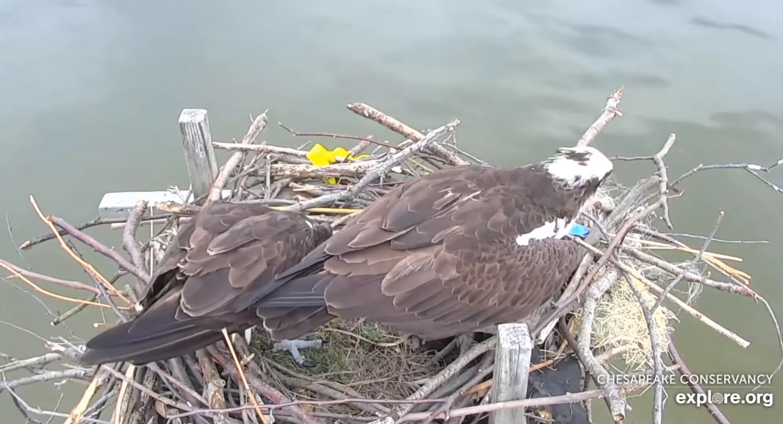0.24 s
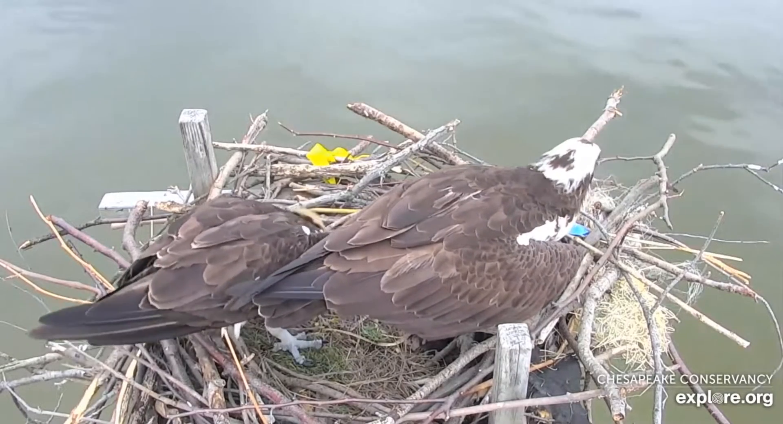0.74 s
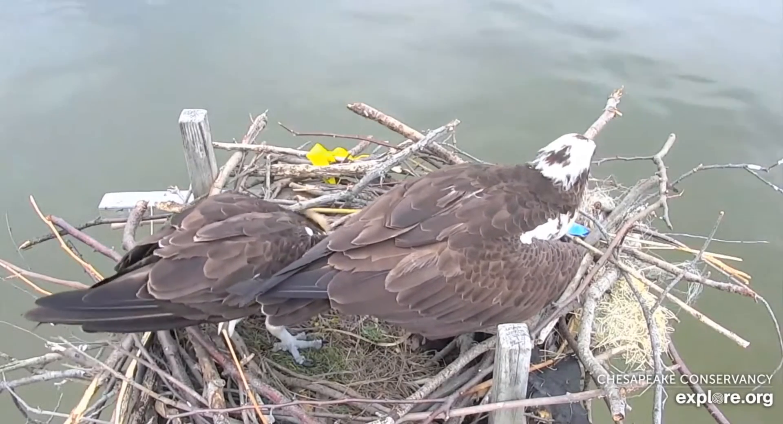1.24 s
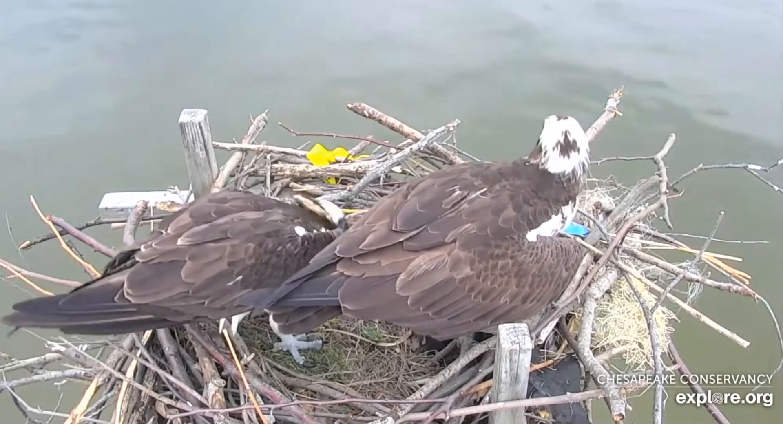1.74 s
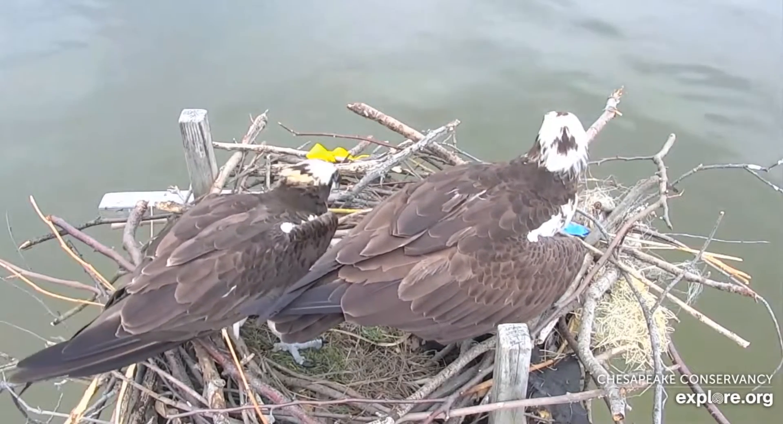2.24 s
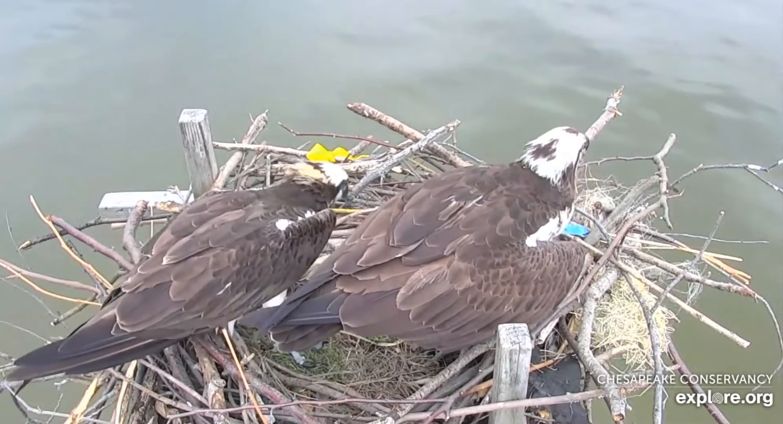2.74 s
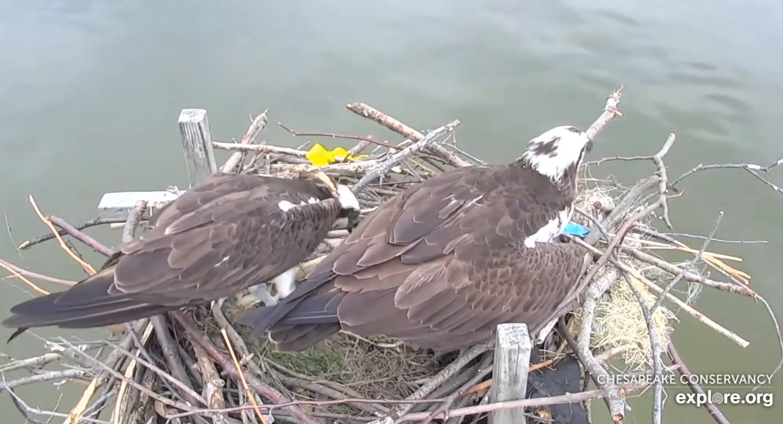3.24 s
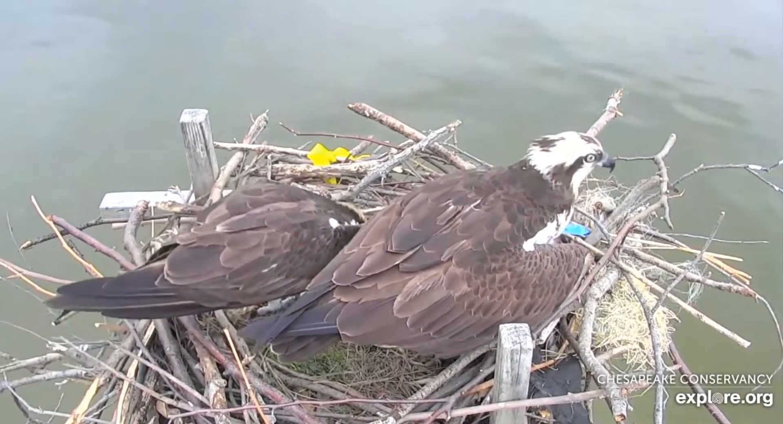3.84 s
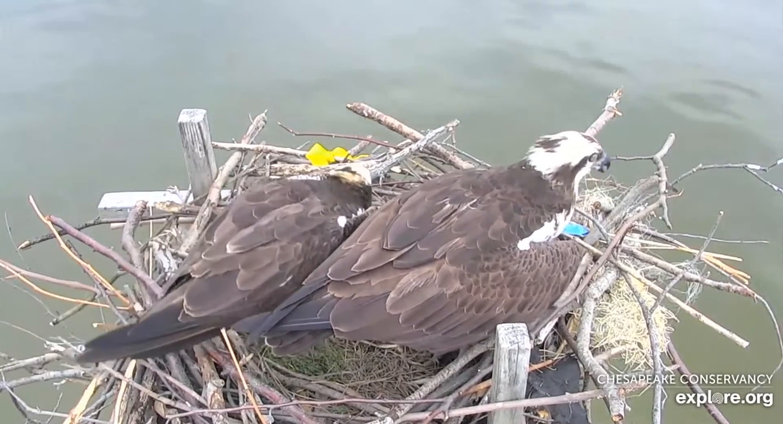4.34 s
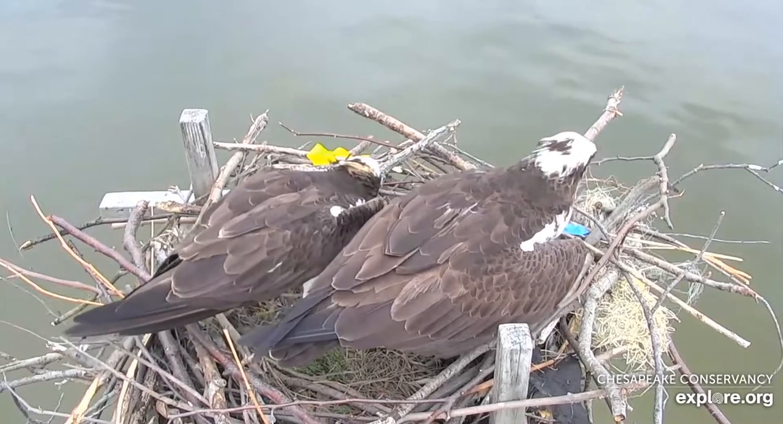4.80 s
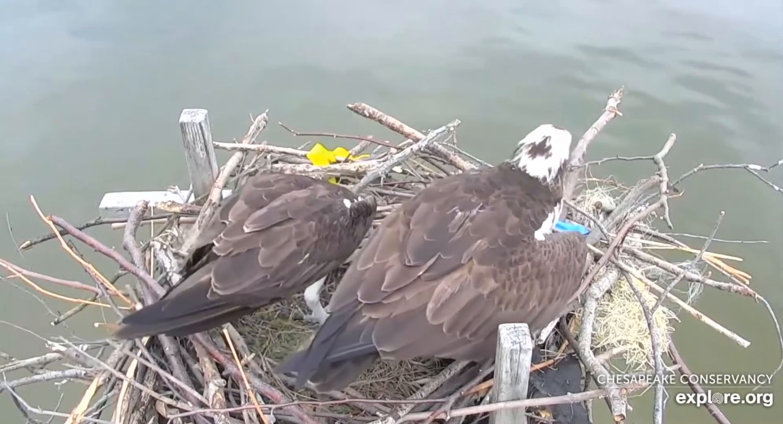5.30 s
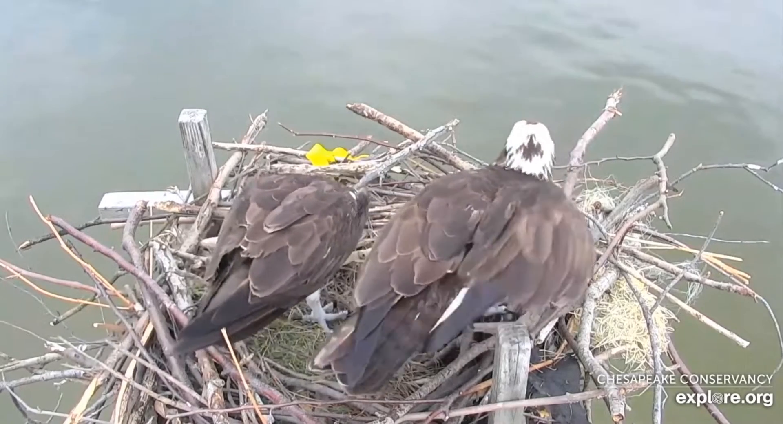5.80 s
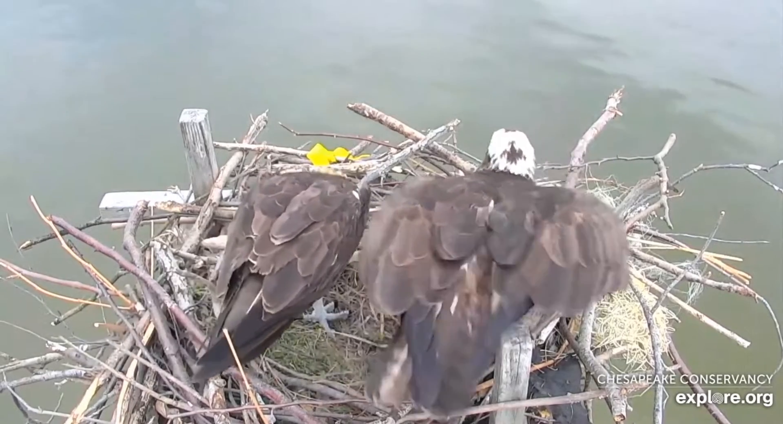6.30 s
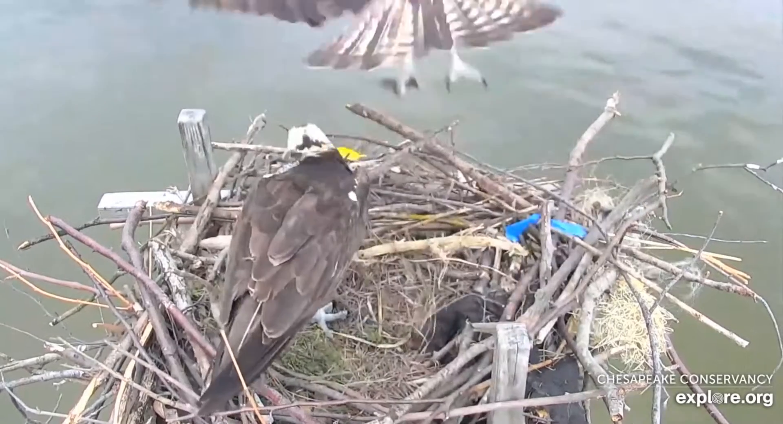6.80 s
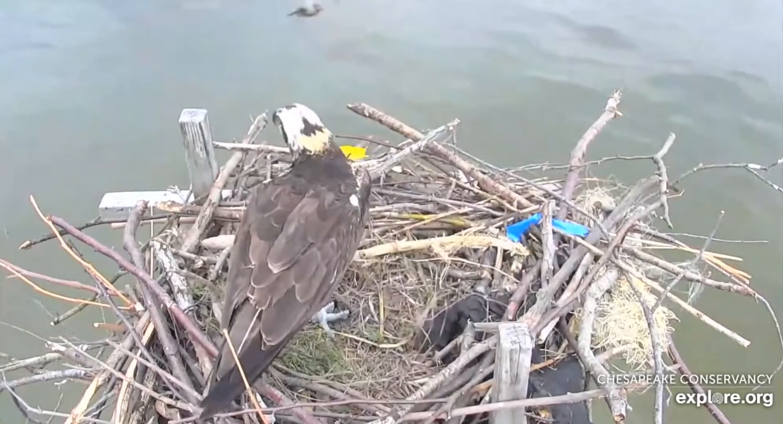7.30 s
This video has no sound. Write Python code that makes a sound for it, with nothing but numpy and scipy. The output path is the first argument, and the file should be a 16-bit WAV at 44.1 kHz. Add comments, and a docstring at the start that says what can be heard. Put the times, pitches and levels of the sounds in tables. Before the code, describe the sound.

Close by on a nest above water, an osprey whistles four quick high chirps, then two longer ones, and after a pause another run of about four, each a little raspy. Then comes a much quieter take-off by another bird: feathers brush, sticks click, the platform knocks softly and wingbeats briefly buffet the microphone. Behind it all lies a faint machine-like hum with hiss that fades down between the calls.

```python
"""Ospreys at the nest

Two ospreys on a stick nest over water. One gives three runs of arched, whistled chirps, slightly hoarse.
The other takes off: feathers rustle, twigs tick, the platform knocks and the downwash buffets the mic.
Behind them is a bed of throbbing hum and hiss; a noise suppressor lets it swell in with the calls
and slowly pulls it down in the pauses."""
import sys
import numpy as np
from scipy import signal
from scipy.fft import rfft, irfft, next_fast_len
from scipy.io import wavfile
from scipy.ndimage import uniform_filter1d

SR = 44100
rng = np.random.default_rng(int(sys.argv[2]) if len(sys.argv) > 2 else 0)


def wav_record(signal):
    """Record a signal, one row per channel, as 16-bit PCM in the file named by sys.argv[1]."""
    frames = np.transpose(np.atleast_2d(signal))
    bounded = np.clip(frames, -1, 1)
    # unit amplitude maps onto the largest positive 16-bit level
    quanta = np.round(bounded * 32767).astype(np.int16)
    wavfile.write(sys.argv[1], SR, quanta)


N = 332955

# partials of the machine hum: f/Hz, relative level/dB, width/Hz
HUM_PARTIALS = [(293.3, -77, 12), (386.7, -73, 16), (424.8, -72, 5.6), (515.4, -84.5, 6.7),
                (834.4, -71.5, 13), (933, -72, 9.4), (963.7, -71, 8), (1262, -79.5, 33), (1375.8, -70, 33),
                (2141, -76.5, 2.2)]
# colour of the air, water and mic hiss: f/Hz, level/dB
HISS_EQ = [(30, -20.5), (55, -9), (90, 6), (300, 3.5), (600, -0.5), (1200, 2), (1800, 1), (4500, -1),
           (5300, 3.5), (5550, 6.5), (5800, 4.5), (6300, -2.5), (10000, -4.5), (16000, -4.5)]
# level of the hiss, dipping briefly in the downwash and ending a little higher: t/s, gain/dB
HISS_LEVEL = [(6.88, 4), (6.92, 5), (6.937, -22.5), (7.005, -18), (7.035, 8), (7.55, 6)]
# soft low swells behind the calls: t/s, width/s, level/dB
DRONE_SWELLS = [(1.25, 0.102, -66), (2.69, 0.042, -62), (5.24, 0.0376, -55), (5.68, 0.0826, -60.5),
                (6.22, 0.024, -64), (6.46, 0.013, -61.5)]

# colour of the feather rustle: f/Hz, level/dB
FEATHER_EQ = [(200, -9), (400, 3.5), (700, -2.5), (1400, 3), (3500, 1), (5500, 4), (8000, 3.5),
              (10000, -11.5), (16000, -14)]
# feathers and feet brushing the nest: t/s, width/s, level/dB
FEATHER_STROKES = [(6.3, 0.095, -59.5), (6.46, 0.0423, -55), (6.604, 0.0384, -52), (6.74, 0.155, -59),
                   (6.9, 0.0073, -56), (7.08, 0.137, -61.5)]
# wing wind on the mic: t/s, level/dB, decay/s
WING_GUSTS = [(6.871, -53.5, 0.0088), (6.93, -54, 0.032), (7.0, -60.5, 0.0233), (7.255, -60.5, 0.0133)]
# twigs and claws: t/s, level/dB, decay/s, low edge/Hz, high edge/Hz
TWIG_TICKS = [(3.279, -59.5, 0.0089, 1500, 2200), (4.19, -62.5, 0.00342, 2000, 5050),
              (6.408, -36, 0.00456, 2564, 6760), (6.431, -55.5, 0.0029, 396, 11990),
              (6.861, -45.5, 0.00172, 500, 2500), (6.916, -45, 0.006, 2500, 15000),
              (6.979, -48, 0.00255, 2000, 11800), (7.139, -41.5, 0.00155, 600, 4440),
              (7.2416, -36.5, 0.00106, 496, 3500), (7.242, -43.5, 0.0049, 8100, 15000)]
# dull knocks through the platform: t/s, level/dB
PLATFORM_KNOCKS = [(6.43, -63), (6.864, -46), (6.921, -56), (7.141, -46), (7.242, -42)]

# early reflections off platform and water: delay/s, level before EQ/dB
EARLY_REFLECTIONS = [(.0095, -21.5), (0.021, -18.5), (0.036, -30)]
# their colour; overtones beamed away from the mic come back this way: f/Hz, gain/dB
REFLECTION_EQ = [(1000, 3), (2800, -3), (4300, 5.5), (4900, 3), (5300, 13.5), (5800, 7), (6500, 0.5),
                 (7700, 8), (9000, -1.5)]

# colour on the overtones and half-pitch tones, with a strong peak near 5.3 kHz: f/Hz, gain/dB
OVERTONE_EQ = [(1300, -1.5), (1500, -8), (3900, -8), (4350, -0.5), (4600, -10), (5000, 2), (5300, 8.5),
               (5600, 4), (5900, 7.5), (6500, -5), (7800, -4.5), (8300, -4.5), (8800, -18), (9800, -34.5)]
# the overtones are stronger low in a chirp's range: pitch/Hz, gain/dB
REEDINESS_BY_PITCH = [(2550, 2.5), (2670, 2.5), (2740, -3), (2810, -2.5), (2900, -3)]
# colour of the breath in the hoarse voice: f/Hz, level/dB
BREATH_EQ = [(60, -18), (400, -19.5), (700, -27.5), (1050, -16.5), (1350, -12), (1700, -16), (2200, -4.5),
             (2800, -2.5), (3400, -5), (4600, -12), (5400, -21.5), (6300, -13.5), (8000, -17), (9500, -24),
             (15000, -42)]
# weak tones between the harmonics when alternate cycles differ: multiple of the pitch, gain/dB
HALF_PITCH_TONES = [(.5, 0), (1.5, 2), (2.5, -1)]
# sidebands of a fast flutter in the voice: harmonic, side (-1 below, 1 above), gain/dB
FLUTTER_SIDEBANDS = [(1, -1, 0.5), (1, 1, -14), (2, -1, -17), (2, 1, -21), (3, -1, -19.5), (3, 1, -24.5)]
# the voice catches, choking the whistle and leaving rasp and overtones: t/s, width/s, depth/dB
VOICE_CATCHES = [(2.558, .008, 3.5), (5.3, 0.02232, 2), (6.003, 0.0203, 13), (6.055, 0.00934, 22.5)]
# rising pickups in the lower register: t/s, length/s, end pitch/Hz, end level/dB, swell/dB
PICKUPS = [(0.428, 0.0845, 2073, -49, 17.5), (0.669, 0.0131, 2065, -32.5, 2.5),
           (4.692, 0.0258, 1885, -55.5, 5.5), (5.143, .007, 2183, -40.5, 15),
           (5.527, 0.017, 2152, -34, 10.5), (5.885, 0.0063, 2145, -39.5, 14.5),
           (6.221, 0.0156, 2737, -40.5, 16)]
# the chirps: t/s, length/s, pitch/Hz, climb/Hz, mid sag/Hz, opening scoop/Hz, closing fall/Hz,
# level/dB, swell/dB, attack/s, last push/dB, overtone trim/dB, brightening/dB, third harmonic trim/dB,
# rasp trim/dB, half-pitch trim/dB, growth of hoarseness/dB, tail level/dB
CHIRP_CUES = [ (0.502, 0.102, 2527, -17.5, 1.5, 39.9, 238.4, -21.5, -11.5, 0.0651, 2, -11, -3.5, -7.5, -14.5, -31.5, -2, -33.5),
              (.686, 0.1261, 2759, 109.5, 40, 165, 387.2, -21.5, 2.5, 0.0142, 2.5, -19.5, -0.5, -6, -17, -31.5, -4.5, -46.5),
              (.94, 0.11926, 2851, 136, 43.5, 190.2, 444, -21.5, 4, 0.0235, 3, -23.5, -1, -0.5, -20, -37.5, 9, -40),
              (1.196, 0.1102, 2887, 195, 52.5, 233.7, 529, -19.5, 3, 0.0326, 0, -23.5, -3.5, 0, -17.5, -34, 5, -36),
              (2.104, 0.256, 2674, 369.5, -13.5, 194.2, 463, -21, 3, 0.0619, -0.5, -25.5, 10, 3, -18, -31.5, 6.5, -37.5),
              (2.465, 0.1866, 2880, 18, 62, 221.3, 497.6, -22.5, 6.5, 0.0261, 0, -22, 3, -2, -16.5, -31, 0.5, -67),
              (4.718, 0.30686, 2720, 363, 48.5, 79.7, 482.5, -21.5, 6, 0.0738, -1.5, -20, -9, 3.5, -16, -28, -4, -37),
              (5.147, 0.2331, 2967, 147, 82, 230.4, 545, -24, -2, 0.04055, 7, -21.5, -0.5, 4.5, -16.5, -30, 0, -37.5),
              (5.534, 0.21944, 2962, 86.5, 90.5, 178.2, 420.1, -17.5, -2.06, 0.0382, -2.5, -31, 0.5, 6, -20, -32, 3.5, -48),
              (5.896, 0.1896, 2877, -20, 90, 148, 360, -21, -3, 0.0416, 3, -23.5, 1, -2, -15.5, -31.5, -4, -42),
              (6.233, 0.0807, 3873, 43, 6, 184.8, 411, -42, 10, 0.0135, 8, -10, 6, -3, -6.5, -40.5, -1, -53),
              (6.315, 0.03116, 2565, -260, 0.5, 40, 169, -31.5, 12.5, 0.0084, 1, -13, -8, 3, -7.5, -30.5, 1, -62.5),
              ]


def from_db(db):
    """Decibels to gain."""
    return 10 ** (np.asarray(db) / 20)


def rms_one(x):
    """Scale to unit rms."""
    return x / np.sqrt(np.mean(np.abs(x) ** 2) + 1e-20)


def eq_gain(curve, hz):
    """Gain of an EQ curve at the given frequencies."""
    f, db = np.transpose(curve)
    return from_db(np.interp(np.log(np.maximum(hz, 1)), np.log(f), db))


def coloured_noise(curve):
    """Unit-rms noise through an EQ curve."""
    size = next_fast_len(N)
    spectrum = rfft(rng.standard_normal(size)) * eq_gain(curve, np.fft.rfftfreq(size, 1 / SR))
    return rms_one(irfft(spectrum, size)[:N])


def drift(rate_hz, size):
    """Smooth random modulator of about unit rms."""
    pole = np.exp(-16 * np.pi * rate_hz / SR)
    slow = signal.lfilter([1], [1, -2 * pole, pole * pole], rng.standard_normal(size // 8 + 8002))[4000:]
    return np.interp(np.arange(size) / 8, np.arange(len(slow)), rms_one(slow))


def blurred_tone(phase, width_hz):
    """A tone whose strength and phase wander."""
    return drift(width_hz, len(phase)) * np.sin(phase) + drift(width_hz, len(phase)) * np.cos(phase)


def edge(distance, span):
    """One at either end of a note, easing to zero a span away."""
    return np.clip(1 - distance / span, 0, 1) ** 2


def bump(t, centre, width):
    """Bell-shaped envelope of height one."""
    return np.exp(-.5 * ((t - centre) / width) ** 2)


def note_gate(start, end, fade):
    """Sample indices of a note and its soft-edged gate."""
    at = np.arange(int((start - fade) * SR), int((end + fade) * SR))
    inside = np.minimum(at / SR - start, end - at / SR)
    return at, np.clip(inside / fade + 1, 0, 1) ** 2


def hum_and_hiss(t, tone_hz=854.3, throb_hz=7.1, throb_depth=0.32):
    """The bed: a machine hum with one strong throbbing tone, over broad hiss."""
    hum = sum(from_db(db - 2.5) * blurred_tone(2 * np.pi * hz * t, width / 2)
              for hz, db, width in HUM_PARTIALS)
    phase = 2 * np.pi * np.cumsum(tone_hz * (1 + 0.001978 * drift(4, N))) / SR
    throb = 1 + throb_depth * np.cos(2 * np.pi * throb_hz * t)
    hum += np.sqrt(2) * from_db(-64) * throb * np.sin(phase)
    bed_db = np.interp(t, *np.transpose(HISS_LEVEL))
    return hum * from_db(bed_db / 2) + from_db(bed_db - 62.5) * coloured_noise(HISS_EQ)


def drone(t, centre_hz=365, width_hz=35):
    """A dull low drone swells and sinks now and then."""
    envelope = sum(from_db(db) * bump(t, s, width) for s, width, db in DRONE_SWELLS)
    return envelope * blurred_tone(2 * np.pi * centre_hz * t, width_hz)


def suppressor(t, events, bed, threshold_db=-50, knee_db=3, floor_db=-17,
               attack_s=.014, hold_s=.13, release_s=0.539):
    """A gate keyed by the whole mix: events pass untouched, the bed swells in, holds and sinks away."""
    key_db = 10 * np.log10(np.abs(uniform_filter1d((events + bed) ** 2, size=220)) + 1e-12)
    trigger = np.clip((key_db - threshold_db) / knee_db, 1e-9, 1)
    held = np.exp(np.maximum.accumulate(np.log(trigger) + t / release_s) - (t - hold_s) / release_s)
    pole = np.exp(-1 / (attack_s * SR))
    opening = signal.lfilter([1 - pole], [1, -pole], np.minimum(held, 1))
    floor = from_db(floor_db)
    return events + (floor + (1 - floor) * opening) * bed


def feathers(t, grain_db=3):
    """Feathers and feet brush the nest in strokes of grainy noise."""
    strokes = sum(from_db(db) * bump(t, s, width) for s, width, db in FEATHER_STROKES)
    return strokes * rms_one(coloured_noise(FEATHER_EQ) * from_db(grain_db * drift(131, N)))


def downwash(t, rise_s=0.0108, band_hz=(48, 180)):
    """Wingbeats push gusts of low rumble onto the mic."""
    gusts = sum(from_db(db) * np.exp(-np.maximum((s - t) / rise_s, (t - s) / decay))
                for s, db, decay in WING_GUSTS)
    band = signal.butter(2, band_hz, "band", fs=SR, output="sos")
    return gusts * rms_one(signal.sosfilt(band, rng.standard_normal(N)))


def twigs(t):
    """Twigs and claws tick: noise bursts that die in milliseconds."""
    out, age = np.zeros(N), t[:SR // 10]
    for s, db, decay, low_hz, high_hz in TWIG_TICKS:
        band = signal.butter(2, [low_hz, high_hz], "band", fs=SR, output="sos")
        burst = rms_one(signal.sosfilt(band, rng.standard_normal(len(age))))
        out[int(s * SR):int(s * SR) + len(age)] += from_db(db) * burst * np.exp(-age / decay)
    return out


def knocks(t, top_hz=1100, rest_hz=110, glide_s=0.00239, decay_s=0.0054):
    """A knock through the platform arrives highs first and drops to a thud."""
    out, age = np.zeros(N), t[:SR // 10]
    pitch = rest_hz + (top_hz - rest_hz) * np.exp(-age / glide_s)
    thud = np.sin(2 * np.pi * np.cumsum(pitch) / SR) * np.exp(-age / decay_s)
    for s, db in PLATFORM_KNOCKS:
        out[int(s * SR):int(s * SR) + len(age)] += from_db(db) * thud
    return out


def open_air(voice, scatter_db=-29, t60_s=0.28):
    """Adds early reflections and a short scatter off sticks and ripples, both through one EQ."""
    t = np.arange(SR // 3) / SR
    response = rng.standard_normal(len(t)) * from_db(-60 * t / t60_s) * (t > .003)
    response *= from_db(scatter_db) / np.linalg.norm(response)
    for delay, db in EARLY_REFLECTIONS:
        response[int(delay * SR)] += from_db(db)
    response = irfft(rfft(response) * eq_gain(REFLECTION_EQ, np.fft.rfftfreq(len(t), 1 / SR)))
    return voice + signal.fftconvolve(voice, response)[:N]


def low_note(start, length, glide_hz, fade_db, harmonics_db=(0, -17, -32, -37), jitter=.006):
    """A short lower-register glide; pitch and level each run between a (first, last) pair."""
    out, span = np.zeros(N), (start, start + length)
    at, gate = note_gate(*span, fade=0.0053)
    pitch = np.interp(at / SR, span, glide_hz)
    level = np.interp(at / SR, span, fade_db)
    phase = 2 * np.pi * np.cumsum(pitch * (1 + jitter * drift(150, len(at)))) / SR
    tone = sum(from_db(db) * np.sin(k * phase) for k, db in enumerate(harmonics_db, 1))
    out[at] = np.sqrt(2) * gate * from_db(level) * tone
    return out


def pickups_and_tails(rise_hz_per_s=5000, break_ratio=0.8113, tail_s=.016, sink_hz=215, fade_db=7):
    """The lower register leads into some chirps; every chirp breaks down into it and sinks away."""
    out = sum(low_note(start, length, (hz - rise_hz_per_s * length, hz), (db - swell, db))
              for start, length, hz, db, swell in PICKUPS)
    for start, length, hz, climb, _, _, fall, *_, db in CHIRP_CUES:
        break_hz = break_ratio * (hz + climb / 2 - fall)
        out += low_note(start + length, tail_s, (break_hz, break_hz - sink_hz), (db, db - fade_db))
    return out


def period_doubling(pitch, phase, trim_db):
    """Alternate cycles differ on and off, so the half-pitch tones waver together."""
    wobble = from_db(trim_db + 3.9 * drift(40, len(pitch)))
    slip = 1.4 * drift(31, len(pitch))
    return wobble * sum(eq_gain(OVERTONE_EQ, ratio * pitch) * from_db(db) * np.sin(ratio * phase + slip)
                        for ratio, db in HALF_PITCH_TONES)


def membrane_flutter(pitch, phase, ratio=.2, width_hz=55, trim_db=-5):
    """The membrane flutters unsteadily at a fraction of the pitch, giving each harmonic sidebands."""
    flutter = 2 * np.pi * np.cumsum(pitch * ratio * (1 + 0.10347 * drift(25, len(pitch)))) / SR
    return sum(from_db(trim_db + db) * blurred_tone(harmonic * phase + side * flutter, width_hz)
               for harmonic, side, db in FLUTTER_SIDEBANDS)


def chirps(scoop_s=0.04493, fall_s=.067, attack_db_per_s=428.5, release_s=0.0347, release_db=9.5,
           clean_s=.043, jitter=0.0041, shimmer=.05, flicker_db=2):
    """The osprey's whistle: nearly pure and a little hoarse, arching as pressure builds and ends."""
    out, breath = np.zeros(N), from_db(-6) * coloured_noise(BREATH_EQ)
    for (start, length, hz, climb, sag, scoop, fall, level_db, swell, attack, push,
         overtone_db, brightening, third_db, rasp_db, half_db, growth, _) in CHIRP_CUES:
        at, gate = note_gate(start, start + length, fade=.003)
        size = len(at)
        age = np.clip(at / SR - start, 0, length)
        left, along = length - age, age / length - .5
        longest_bend = .6 * length
        bend = scoop * edge(age, min(scoop_s, longest_bend)) + fall * edge(left, min(fall_s, longest_bend))
        pitch = hz + climb * along - sag * np.cos(np.pi * along) ** 4 - bend
        level = level_db + swell * along - attack_db_per_s * attack * edge(age, attack)
        level -= release_db * edge(left, release_s)
        level += push * bump(left, centre=0.0143, width=0.00788)   # a last push just before the end
        # a catch ducks the fundamental, roughens the pitch and lifts the half-pitch tones
        choke_db = sum(db * bump(at / SR, s, width) for s, width, db in VOICE_CATCHES)
        waver = jitter * (1 + .2 * choke_db) * drift(220, size)
        phase = 2 * np.pi * np.cumsum(pitch * (1 + waver)) / SR
        tone = from_db(-choke_db) * np.sin(phase) * (1 + shimmer * drift(60, size))
        for k, trim_db in ((2, -1), (3, third_db - 1)):
            colour = eq_gain(OVERTONE_EQ, k * pitch) * eq_gain(REEDINESS_BY_PITCH, pitch)
            strength_db = overtone_db + trim_db + brightening * along + flicker_db * drift(47, size)
            tone += colour * from_db(strength_db) * np.sin(k * phase)
        # hoarseness needs full pressure, so both ends are cleaner
        ends = edge(age, clean_s) + edge(left, clean_s)
        tone += period_doubling(pitch, phase, half_db - 10 * ends + growth * along + .52 * choke_db)
        rasp = breath[at] + membrane_flutter(pitch, phase)
        rasp *= from_db(rasp_db - 7.5 * ends + growth * along)
        out[at] += gate * from_db(level) * (np.sqrt(2) * tone + rasp)
    return out


def scene(self_noise_db=-80):
    """The mono mix: calls and take-off over the gated bed, plus a trace of electronic hiss."""
    t = np.arange(N) / SR
    calls = open_air(chirps() + pickups_and_tails())
    movement = feathers(t) + downwash(t) + twigs(t) + knocks(t)
    bed = hum_and_hiss(t) + drone(t)
    mix = suppressor(t, calls + movement, bed)
    return mix[None] + from_db(self_noise_db) * rng.standard_normal(N)


def record(dry, low_cut_hz=58, high_cut_hz=15900):
    """Master EQ: a gentle low cut and a steep high cut."""
    thinned = signal.sosfilt(signal.butter(2, low_cut_hz, "high", fs=SR, output="sos"), dry)
    return signal.sosfilt(signal.ellip(12, .1, 80, high_cut_hz, fs=SR, output="sos"), thinned)


dry = scene()
out = record(dry)
wav_record(out)
```